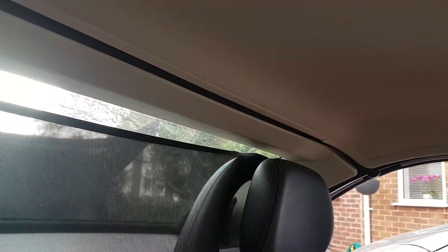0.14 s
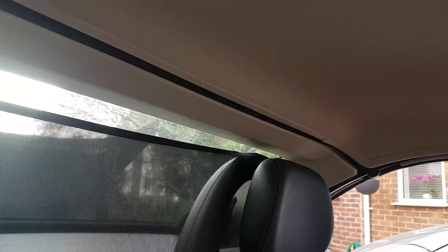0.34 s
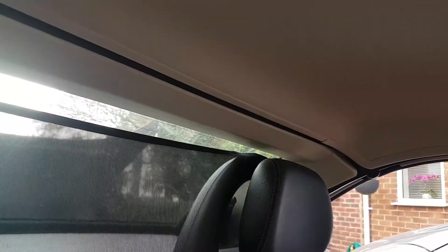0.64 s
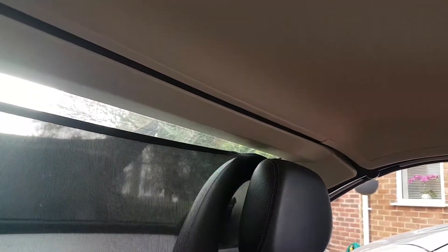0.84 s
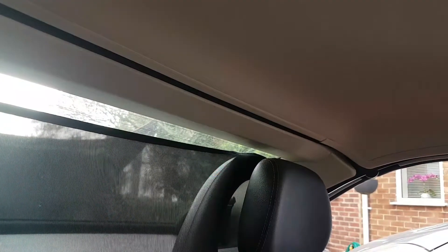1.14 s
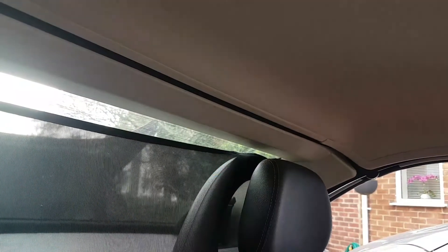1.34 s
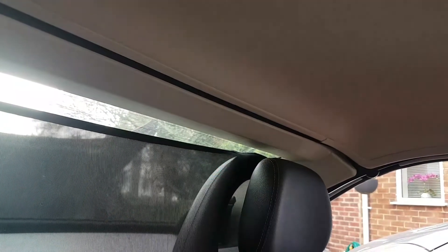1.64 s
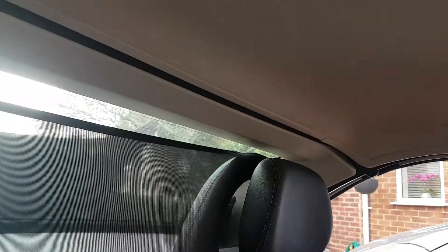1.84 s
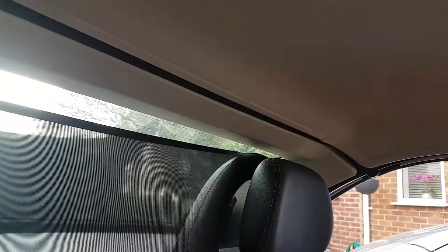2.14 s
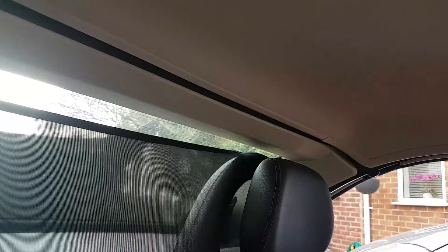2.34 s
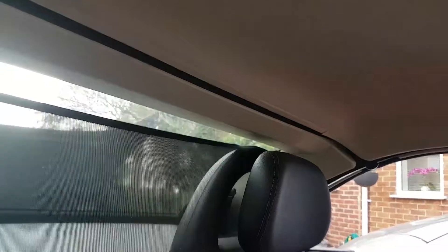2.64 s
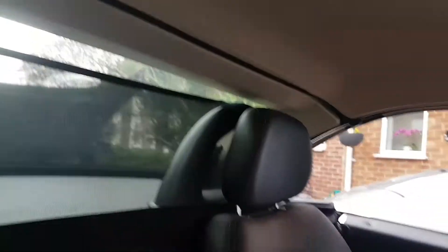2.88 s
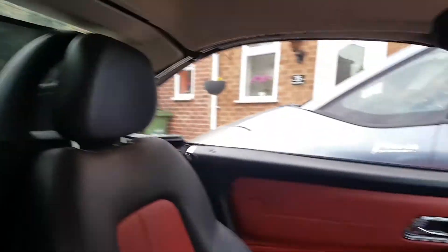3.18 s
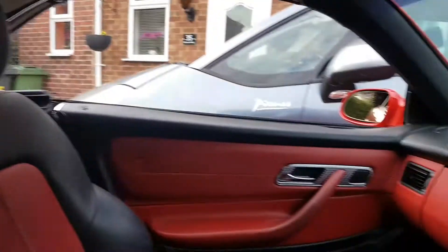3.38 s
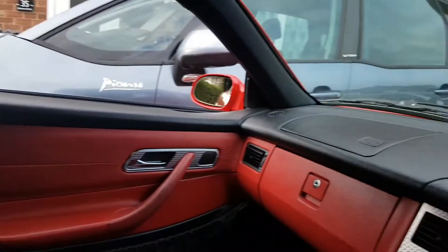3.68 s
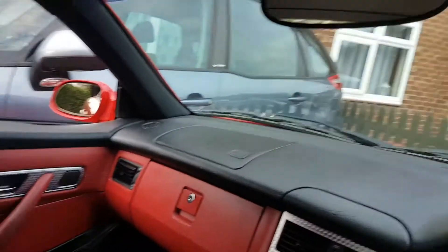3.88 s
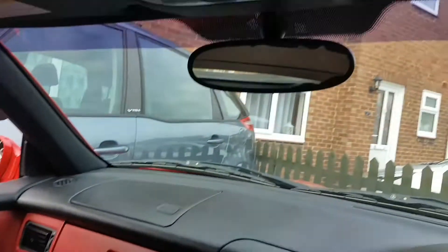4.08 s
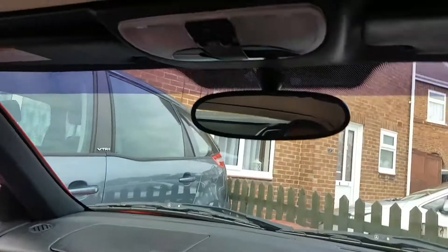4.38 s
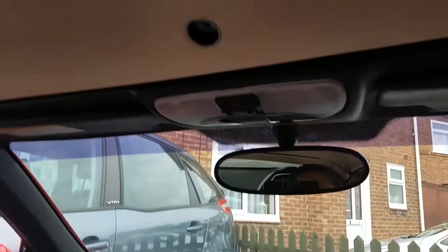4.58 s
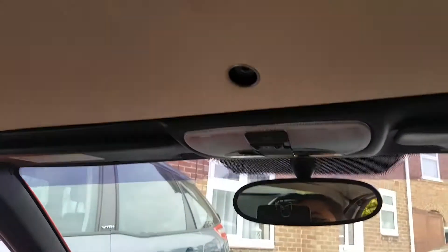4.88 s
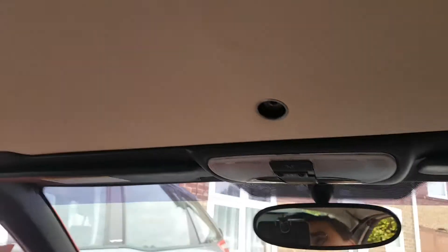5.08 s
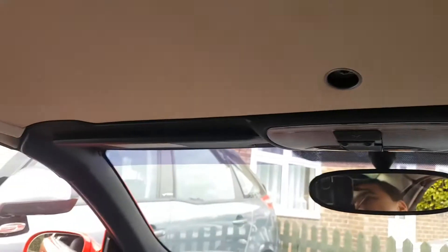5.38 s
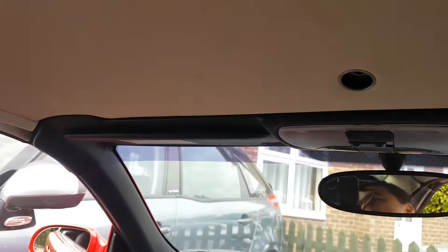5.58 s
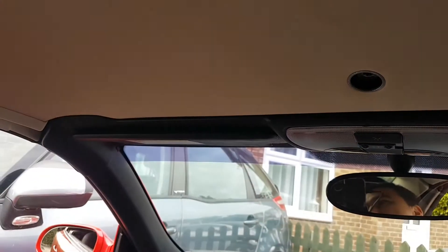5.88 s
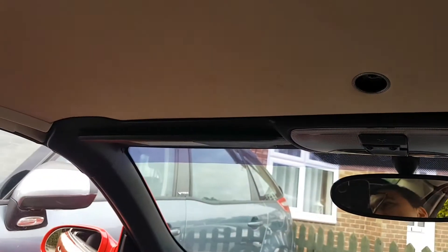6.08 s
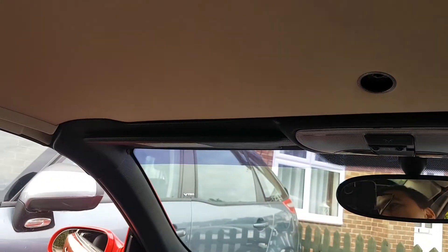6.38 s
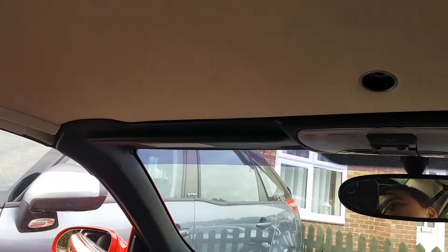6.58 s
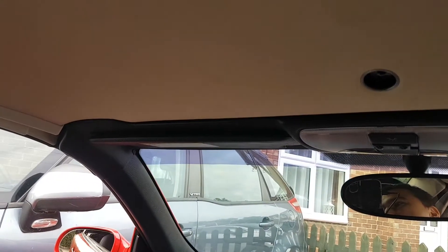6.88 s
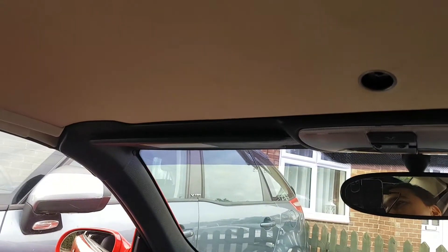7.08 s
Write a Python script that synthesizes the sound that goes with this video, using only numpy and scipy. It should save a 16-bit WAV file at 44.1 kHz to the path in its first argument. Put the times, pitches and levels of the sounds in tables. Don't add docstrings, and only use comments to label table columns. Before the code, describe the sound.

Close inside a parked car with the engine idling low, a roof pump whines roughly and the latch slams at once. The pump then hums on one steady low note, a switch clicks, and a second stroke clunks, creaks, hisses and slams. A long stalled hum follows, with another switch click, before a last creaking stroke, a sharp relay snap and a final thud.

```python
import sys
import numpy as np
from scipy import signal
from scipy.io import wavfile

SR = 44100
rng = np.random.default_rng(int(sys.argv[2]) if len(sys.argv) > 2 else 0)


def master(y):
    cut = np.clip(np.atleast_2d(y).T, -1, 1)
    pcm = np.round(cut * 32767)
    wavfile.write(sys.argv[1], SR, pcm.astype(np.int16))


def natural_amplitude(level_db):
    exponent = np.asarray(level_db, float) / 20
    return 10 ** exponent


N = 318843
TIME = np.arange(N) / SR

# (valve opens [s], heaviest load [s], latch stops [s], load builds over [s], load eases over [s])
STROKES = [
    (-.2, .12, .478, .18, .09),
    (1.77, 2.12, 2.72, .078, .145),
    (6.47, 6.855, 7.037, .115, .15),
]


def rms_one(x):
    return x / np.sqrt(np.mean(x ** 2) + 1e-20)


def in_time(rows):
    s, *columns = np.transpose(rows)
    return [np.interp(TIME, s, c) for c in columns]


def at_hz(points, hz):
    points = np.array(points)
    return np.interp(np.log(hz), np.log(points[:, 0]), points[:, 1])


def fade(start, end, rise_s, fall_s):
    return np.clip(np.minimum((TIME - start) / rise_s, (end - TIME) / fall_s) + .5, 0, 1)


def bump(s, width):
    return np.exp(-((TIME - s) / width) ** 2)


def drift(rate):
    r = np.exp(-80 * np.pi * rate / SR)
    draws = rng.standard_normal(N // 40 + 2002)
    slow = signal.lfilter([1], [1, -2 * r, r * r], draws)[2000:]
    return np.interp(np.arange(N) / 40, np.arange(len(slow)), rms_one(slow))


def tone(hz, lead=0.):
    turn = 2 * np.pi * (np.cumsum(hz) / SR + rng.random())
    return np.sqrt(2) * np.sin(turn + np.array([[lead], [0]]))


def ring(hits, hz, t60):
    r, w = natural_amplitude(-60 / (t60 * SR)), 2 * np.pi * hz / SR
    return signal.lfilter([0, np.sin(w)], [1, -2 * r * np.cos(w), r * r], hits)


def band(x, low_hz, high_hz):
    return signal.sosfilt(signal.butter(2, [low_hz, high_hz], "band", fs=SR, output="sos"), x)


def pair(size, alike):
    mid, side = rng.standard_normal((2, size))
    return np.sqrt((1 + alike) / 2) * mid + np.sqrt((1 - alike) / 2) * side * [[1], [-1]]


def sides(pan_db):
    return natural_amplitude(np.array([[.5], [-.5]]) * pan_db)


def add(out, s, piece):
    at = round(s * SR)
    out[:, at:at + piece.shape[1]] += piece[:, :N - at]


def struck(modes, db, spread_s, alike, loose=1.04):
    t = np.arange(round(.3 * SR)) / SR
    out = 0
    for k, (hz, mode_db, t60) in enumerate(modes):
        chatter = loose * pair(len(t), alike) * np.exp(-t / spread_s) / np.sqrt(spread_s * SR)
        chatter[:, 0] += (-1) ** k
        out = out + natural_amplitude(mode_db) * band(ring(chatter, hz, t60), hz / 2, hz * 2)
    return natural_amplitude(db) * out / np.max(abs(out.mean(axis=0)))


def tuned(modes, tuning):
    return [(hz * tuning, db, t60) for hz, db, t60 in modes]


def layers_db():
    rest_db, flow_db = [2.7, 2.55, 3.24, 0.52], [2.84, 2, 5.9, 6.3]
    shudder_db, shudder_s = [8.5, 8, 11.5], 0.31
    # (centre [s], half length [s], level [dB], layer
    swells = [(0.53, 0.079, 9.5, 0.5), (1.97, 0.092, 8.5, 2.5), (2.201, .06, 11, -1), (2.7, 0.049, 3.5, 1),
              (3.353, 0.13, 3, 0.5), (3.3, 0.22, 4, 3.5), (3.948, .3, 7, 3.5), (4.201, 0.51, 1.5, 0.5),
              (6.51, 0.044, 6, 2.6), (6.693, 0.11, 2.5, 0.8), (7.25, 0.052, -8, 5)]
    out = np.outer(rest_db, np.ones(N))
    for (opens, _, stops, _, _), db in zip(STROKES, shudder_db):
        out += np.outer(flow_db, fade(opens + 0.013, stops + .06, 0.027, 0.11))
        calming = np.exp(-np.maximum(TIME - opens, 0) / shudder_s)
        out[0] += db * fade(opens + 0.016, stops, 0.043, .1) * calming
    for s, width, db, layer in swells:
        reach = np.exp(-((np.arange(4) - layer) / 0.87) ** 2)
        out += np.outer(db * reach, bump(s, width))
    return out


def cabin():
    # (frequency [Hz], level [dB per Hz])
    colour = [(15, -32), (25, -3), (64, -9), (80, -6), (96, -15.5), (148, -17), (189, -23.5), (382, -20),
              (437, -32.5), (637, -27.5), (749, -30.5), (1870, -40), (9210, -64), (14600, -59.5),
              (15800, -75)]
    # (frequency [Hz], left-right likeness [-1 to 1])
    likeness = [(60, 0.97), (130, 0.96), (290, 0.92), (640, 0.08), (1410, -0.4), (3100, 0.2), (6820, -0.08),
                (15000, 0.03)]
    # (frequency [Hz], left minus right [dB])
    lean = [(60, -2), (180, 3), (550, -4), (1650, -2), (4970, -3), (15000, 0.5)]
    levels = layers_db()
    out, together = 0, drift(5)
    edges = 22 * 2 ** np.arange(0, 9.6, .5)
    white = rng.standard_normal((2, 2, N))
    for k, (low, high) in enumerate(zip(edges, edges[1:])):
        mid, side = band(white[k % 2], low, high)
        hz = np.sqrt(low * high)
        place = np.interp(np.log(hz), np.log([300, 950, 2400, 6500]), np.arange(4))
        share = np.clip(1 - abs(place - np.arange(4)), 0, 1) * min(1, hz / 200)
        alike = np.clip(at_hz(likeness, hz), -1, 1)
        gain = natural_amplitude(at_hz(colour, hz) + share @ levels + 0.8 * together + 1.07 * drift(19))
        spread = np.sqrt((1 - alike) / (1 + alike)) * side * [[1], [-1]]
        out = out + gain * (mid + spread) * sides(at_hz(lean, hz))
    return natural_amplitude(-11.5) * out


def engine():
    # (time [s], firing rate [Hz], firing tone [dB])
    idle = [(0, 51.8, -31.5), (.5, 51.3, -29.5), (1.3, 52.14, -32), (1.7, 51.26, -30), (2, 51.74, -30),
            (2.5, 50.66, -30.5), (3.9, 50.95, -30), (4.35, 50.8, -30), (4.6, 50.6, -31), (5.9, 50.43, -31),
            (6.2, 51.56, -31), (6.65, 49.8, -30.5), (6.9, 50.1, -31), (7.23, 49.4, -29.5)]
    # (multiple of the firing rate, level re the firing tone [dB])
    orders = [(.5, -17.5), (1.5, -26), (2, -23), (2.25, -26), (2.5, -23), (3, -28)]
    # (frequency [Hz], width [Hz], level [dB])
    panels = [(226, 16, -57), (385, 30, -60), (547, 32, -55), (885, 45, -64), (1150, 45, -63)]
    # (time [s], level [dB])
    throb = [(0, 4.5), (.6, 0), (3, 1.5), (4.3, -1), (5.8, 4), (6.4, 3), (7.23, 7.5)]
    hz, db = in_time(idle)
    out = natural_amplitude(db) * tone(hz, lead=0.12)
    for k, order_db in orders:
        out += natural_amplitude(-29.5 + order_db + 0.86 * drift(1.7)) * tone(k * hz, lead=0.15)
    shake = natural_amplitude(in_time(throb)[0] + 2.64 * np.sin(np.pi * np.cumsum(hz) / SR))
    for panel_hz, width, panel_db in panels:
        out += natural_amplitude(panel_db) * rms_one(ring(pair(N, 0.37), panel_hz, 1.8 / width)) * shake
    return out * sides(-1.55)


def clicks():
    # (time [s], peak [dB], top [dB], case thump [dB])
    switch = [
        (1.0174, -49, -76, -59),
        (1.0755, -26, -48, -24.5),
        (5.672, -40.5, -64, -47),
        (5.7824, -26, -45.5, -21.5),
    ]
    # (time [s], peak [dB], top [dB], case thump [dB])
    relay = [
        (.3936, -22.5, -41, -36),
        (2.5453, -45.5, -54, -52),
        (2.5674, -22.5, -34.5, -31),
        (6.4935, -44.5, -61, -31.5),
        (6.912, -20, -41.5, -28.5),
        (7.1165, -33.5, -51, -27.5),
    ]
    # (frequency [Hz], level [dB], t60 [s])
    switch_modes = [(2575, 5.5, 0.025), (3510, -10.5, 0.056), (4600, -19, 0.012), (6670, -12, 0.042)]
    # (frequency [Hz], level [dB], t60 [s])
    relay_modes = [(2860, 5, 0.013), (3310, 5, 0.018), (4170, 6.5, 0.018), (4360, -2.5, .012),
                   (5600, -30, 0.0046)]
    out, t = np.zeros((2, N)), np.arange(round(.12 * SR)) / SR
    dying = np.minimum(t / .0012, 1) * (np.exp(-t / .0045) + .3 * np.exp(-t / .015))
    pan = sides(-3)
    for rows, modes, ring_db, loose in [(switch, switch_modes, -3, .4), (relay, relay_modes, -6, .8)]:
        for s, db, top_db, thump_db in rows:
            bright = band(pair(len(t), 0.12), modes[0][0] * 0.89, 8900)
            snap = natural_amplitude(db - 9.5) * rms_one(band(bright, 1620, 5470)) * dying
            top = natural_amplitude(top_db + 4.0) * rms_one(band(pair(len(t), 0.089), 8900, 18000)) * dying
            add(out, s - .001, (snap + top) * pan)
            add(out, s, struck(modes, db + ring_db, 0.00045, 0.54, loose) * pan)
            thump = struck([(305, 0, 0.045)], thump_db, 0.001, 0.93)
            thump += struck([(633, 0, 0.013), (865, 0, 0.034)], thump_db - 8, .003, .6)
            add(out, s + 0.00176, thump)
    return out


def seals():
    # (time [s], level [dB], length [s])
    creaks = [(1.80, -55, .03), (1.835, -53, .03), (1.885, -53, .015), (1.92, -50, .06), (2.035, -52, .015),
              (2.336, -53, .01), (6.555, -50, .035), (6.604, -45, .016), (6.634, -46, .032),
              (6.666, -45, .044), (6.729, -45, .06), (6.811, -46, .026), (6.854, -46, .018),
              (6.984, -50, .006), (7.031, -48, .005)]
    out, t = np.zeros((2, N)), np.arange(round(.1 * SR)) / SR
    for s, db, length in creaks:
        hz = 2260 * rng.uniform(.97, 1.03)
        moving = np.clip((length - t) / 0.005, 0, 1)
        pace = rng.exponential(1, len(t) // 60 + 1).repeat(60)[:len(t)]
        slipped = np.diff(np.floor(np.cumsum(650 / SR * pace)), prepend=-1) > 0
        slips = pair(len(t), .6) * (1.2 + signal.lfilter([1], [1, -.98], slipped)) * moving
        squeak = ring(slips, hz, .012) + .8 * ring(slips, hz * .86, .012) + .6 * ring(slips, hz * 1.08, .012)
        squeak = rms_one(band(squeak, hz * .8, hz * 1.17)) * np.sqrt(length / t[-1])
        hiss = rms_one(band(pair(len(t), 0.14), 4300, 7800)) * moving
        add(out, s, natural_amplitude(db) * (squeak + natural_amplitude(-13.5) * hiss) * sides(-1.0))
    return out


def ticks():
    # (first tick [s], period [s], ticks [count])
    runs = [(.037, .0388, 8), (.3694, .079, 2), (1.771, .025, 2), (1.849, .039, 7), (2.135, .04, 10),
            (4.1, .052, 3), (6.559, .028, 3), (6.779, .052, 5)]
    first_db = [-51, -44, -54.5, -45.5, -49, -55, -54, -54]
    decays = [0.0054, .005, 0.0043, 0.011, 0.0041, .005, 0.0049, .005]
    # (time [s], level [dB])
    offbeats = [(0.025, -45), (.3284, -53), (1.9444, -41), (2.054, -43), (2.6549, -45)]
    out = [(s, db, 0.0046) for s, db in offbeats]
    for (start, period, count), db, decay in zip(runs, first_db, decays):
        for k in range(count):
            s = start + period * k + .0015 * rng.normal()
            out.append((s, db - 0.2 * k + 6 * rng.normal(), decay))
    return out


def linkage():
    out, t = np.zeros((2, N)), np.arange(round(.1 * SR)) / SR
    body_hz = 2250
    for s, db, decay in ticks():
        hz = 6300 * rng.uniform(0.72, 1.16)
        tick = rms_one(band(pair(len(t), 0.28), hz * 0.92, hz * 1.27))
        tick += .5 * rms_one(band(pair(len(t), .2), 1800, 10500))
        tick += natural_amplitude(3.5) * rms_one(band(pair(len(t), .4), body_hz * 0.77, body_hz * 1.42))
        add(out, s, natural_amplitude(db - 10.5) * tick * np.exp(-t / decay) * sides(-6.5))
    return out


def blows():
    # (delay [s], ring [dB], thud [dB], thud [Hz], crack [dB])
    slam = [
        (0, 2.5, -0.5, 149.4, 1.5),
        (.025, -9.5, -5, 204.7, -24),
        (.046, -1, -17, 90, 1.5),
        (.061, -4, -5.5, 118, -5),
        (.077, -33, -14, 118, -43),
    ]
    # (time [s], ring of first blow [dB], ring of rebounds [dB], thud [dB], crack [dB])
    slams = [
        (.482, -16, -25, -13.5, -32),
        (2.723, -14.5, -20.5, -15.5, -30.5),
        (7.044, -25.5, -22, -13.5, -33.5),
    ]
    # (delay [s], ring [dB], thud [dB], thud [Hz], crack [dB])
    take_up = [(0, -10.5, -5.5, 150.3, -8), (.015, -13.5, -7, 208, -17), (.056, -10, -23, 150, -15),
               (.076, 2, -1, 165, -5), (.097, -5, -10.5, 170, -15)]
    # (time [s], ring of first blow [dB], ring of rebounds [dB], thud [dB], crack [dB])
    take_ups = [
        (1.747, -24, -23.5, -19, -40),
        (6.469, -17, -23.5, -19, -39),
    ]
    # (time [s], ring [dB], thud [dB], thud [Hz], crack [dB])
    strays = [(.116, -33.5, -44, 118, -54), (2.198, -37, -27, 116, -48), (2.859, -48, -26, 134, -57)]
    slam_tuning, take_up_tuning = [(1, 1), (1, 1), (.72, 1.12)], [(.85, .85), (.78, .9)]
    out = [(*row, 1) for row in strays]
    for pattern, rows, tunings in [(slam, slams, slam_tuning), (take_up, take_ups, take_up_tuning)]:
        for (s, first_db, rest_db, low_db, high_db), (first, rest) in zip(rows, tunings):
            for k, (delay, ring_db, thud_db, hz, crack_db) in enumerate(pattern):
                blow_db, tuning = (rest_db, rest) if k else (first_db, first)
                out.append((s + delay, blow_db + ring_db, low_db + thud_db, hz, high_db + crack_db, tuning))
    return out


def knocks():
    # (frequency [Hz], level [dB], t60 [s])
    thud_modes = [(96.2, -7.5, 0.53), (118, -6, 0.22), (156.4, 0.5, 0.13), (184.6, -2.5, 0.079),
                  (224, -1, 0.12), (261, -5.5, 0.12), (355, -16.5, 0.15)]
    # (frequency [Hz], level [dB], t60 [s])
    frame_modes = [(427.5, 2.5, 0.049), (504, -6.5, 0.11), (546, -8, 0.16), (650, -4.5, 0.086),
                   (763, 3.5, 0.052), (837, 2.5, 0.05), (947, -15, 0.19), (1133, -4.5, 0.032)]
    # (frequency [Hz], level [dB], t60 [s])
    crack_modes = [(1200, -3, .035), (1450, -3, .035), (1650, 0, .045), (1820, 0, .045), (2000, -3, .04),
                   (2350, -8, .03)]
    out, t = np.zeros((2, N)), np.arange(round(.1 * SR)) / SR
    dying = np.minimum(t / 0.0029, 1) * np.exp(-t / 0.013)
    pan = sides(-3)
    for s, db, thud_db, thud_hz, crack_db, tuning in blows():
        rattle = rms_one(band(pair(len(t), .2), 1000, 2800))
        rattle += .3 * rms_one(band(pair(len(t), .2), 2800, 7500))
        add(out, s - .001, natural_amplitude(crack_db - 10) * rattle * dying * pan)
        ringing = struck(tuned(frame_modes, tuning), db, 0.00091, 0.24, 1.0)
        ringing[1] = np.roll(ringing[1], 12)
        ringing += struck(tuned(crack_modes, tuning), crack_db + 3.5, 0.0078, 0.27, 0.83)
        low_modes = tuned(thud_modes, 1 / tuning) + [(thud_hz, 4.0, .15)]
        add(out, s - .001, struck(low_modes, thud_db, 0.012, 0.86) + ringing * pan)
    return out


def stalled_pump():
    # (start [s], end [s], frequency [Hz], level [dB])
    stalls = [
        (.6, 1.77, 137.5, -35.5),
        (2.82, 6.49, 138, -35.5),
        (7.14, 7.3, 131, -37),
    ]
    out = np.zeros((2, N))
    turn_db = 5.5 * bump(3.84, 0.99)
    for start, end, hz, db in stalls:
        note = tone(hz + 0.88 * np.exp(-abs(TIME - start) / 0.073), lead=0.15)
        gain = natural_amplitude(db - turn_db + 0.38 * drift(11.0))
        out += fade(start, end, 0.021, 0.032) * gain * note * sides(1.36)
    return out


def flowing_pump():
    # (multiple, level re the eighth [dB], left lead [rad])
    gears = [(2, 3, .3), (3, -8, 1.), (5, -7, 1.2), (6, -10, .8), (7, -13, .9), (8, 0, .9), (9, -17, .5),
             (11, -17, .7), (12, -21, .5)]
    # (frequency [Hz], width [Hz], lift [dB])
    housing = [(2420, 60, 14), (3975, 70, 7)]
    # (time [s], dip [dB])
    falters = [
        (.17, 12),
        (2.27, 9),
    ]
    whine_levels = [-60, -61, -57]
    hum_levels = [-43.5, -45, -43]   # dB, per stroke
    free_hz, load_sag_hz = 2899, 153
    engage_db, spin_up_s = 16, 0.116
    out = np.zeros((2, N))
    falter_db = sum(db * bump(s, 0.043) for s, db in falters)
    for (opens, heaviest, stops, builds, eases), whine_db, motor_db in zip(STROKES, whine_levels, hum_levels):
        since = np.clip(TIME, opens, stops) - heaviest
        load = bump(heaviest, np.where(since < 0, builds, eases))
        hz = free_hz - load_sag_hz * load
        engaging_db = engage_db * np.maximum(-since / builds - .9, 0)
        db = whine_db + 5.5 * since - engaging_db - falter_db
        hum_db = motor_db + 1.5 * load - 16.5 * np.maximum(since, 0)
        whine = 0
        for k, gear_db, lead in gears:
            gear_hz = hz * k / 8
            lift_db = sum(peak_db * np.exp(-((gear_hz - peak_hz) / width) ** 2)
                          for peak_hz, width, peak_db in housing)
            whine = whine + natural_amplitude(db + gear_db + lift_db + 1.1 * drift(25)) * tone(gear_hz, lead=lead)
        hum = natural_amplitude(hum_db + 5.85 * drift(21)) * tone(114 * (1 + 0.0159 * drift(5.9)), lead=.1)
        out += fade(opens + spin_up_s, stops, .016, .016) * (whine * sides(-0.2) + hum)
    return out


def scene():
    return cabin() + engine() + clicks() + seals() + linkage() + knocks() + stalled_pump() + flowing_pump()


def roll_off(x):
    return signal.sosfilt(signal.butter(12, 16470, fs=SR, output="sos"), x)


def record(dry):
    top = signal.cheby2(14, 32, 15750, fs=SR, output="sos")
    return roll_off(signal.sosfilt(top, dry))


dry = scene()
out = record(dry)
master(out)
```